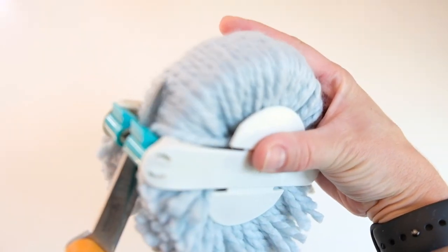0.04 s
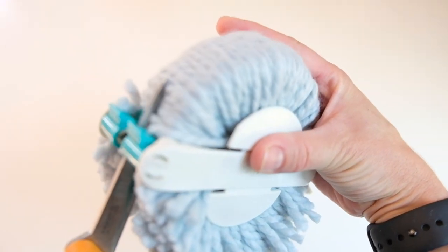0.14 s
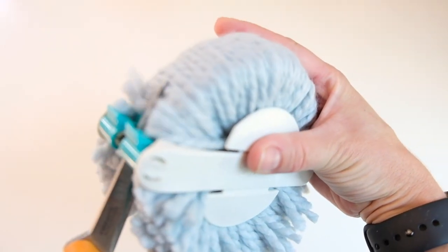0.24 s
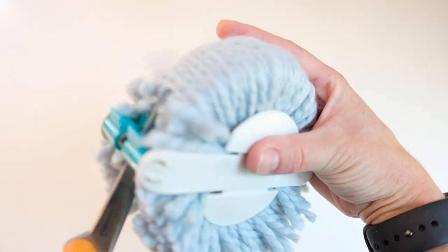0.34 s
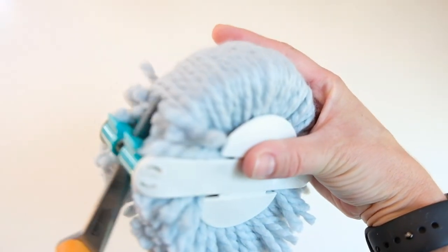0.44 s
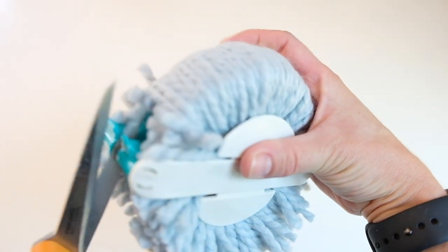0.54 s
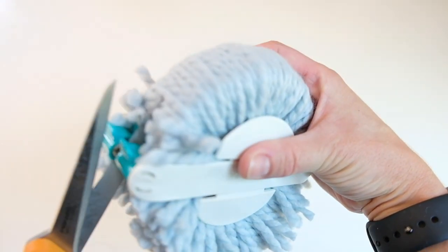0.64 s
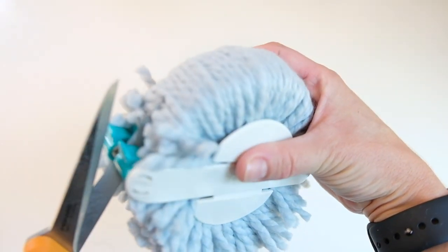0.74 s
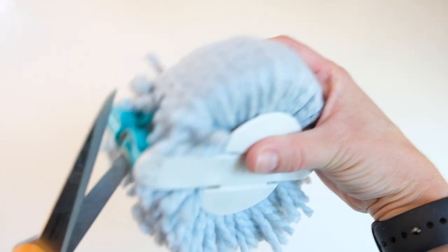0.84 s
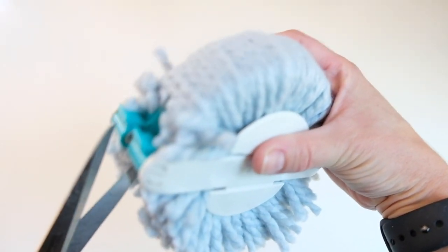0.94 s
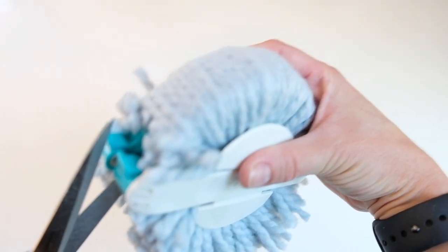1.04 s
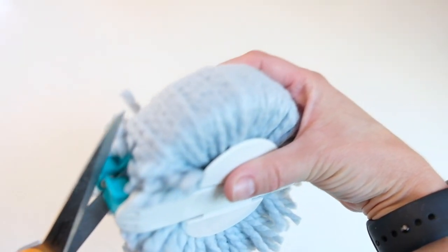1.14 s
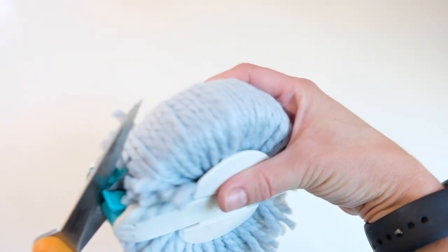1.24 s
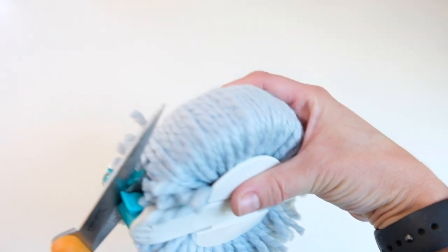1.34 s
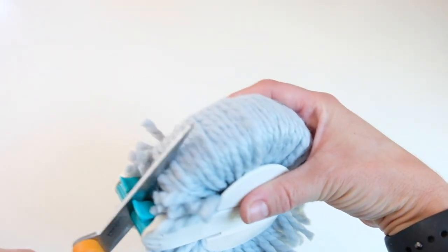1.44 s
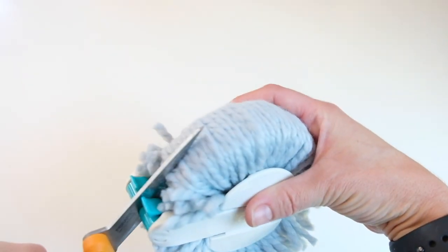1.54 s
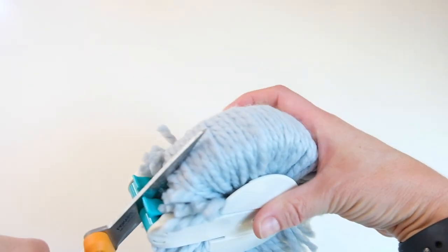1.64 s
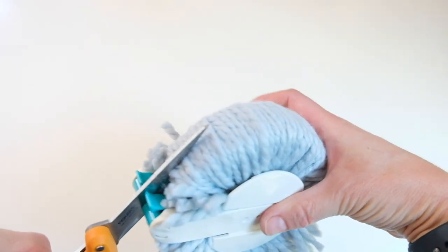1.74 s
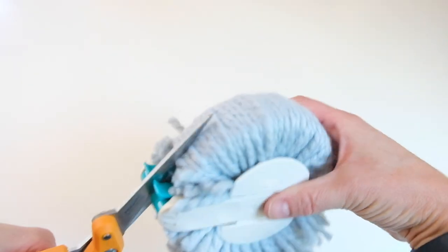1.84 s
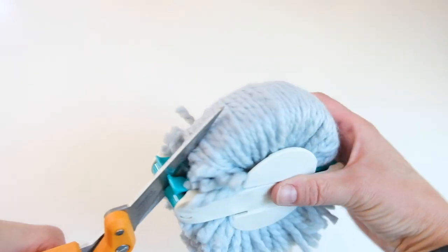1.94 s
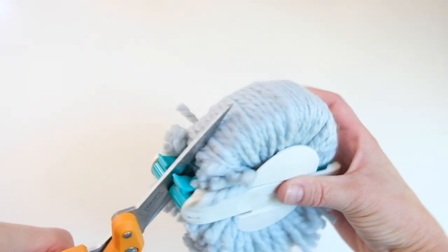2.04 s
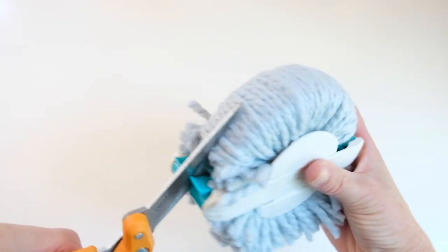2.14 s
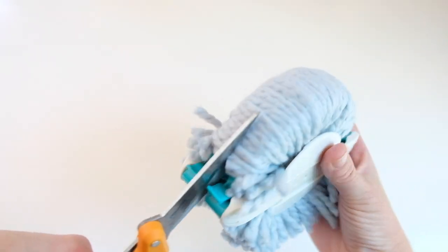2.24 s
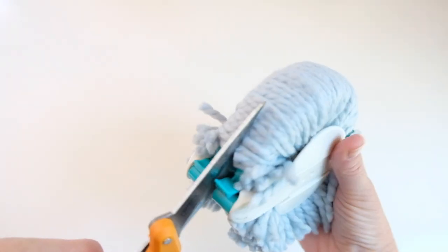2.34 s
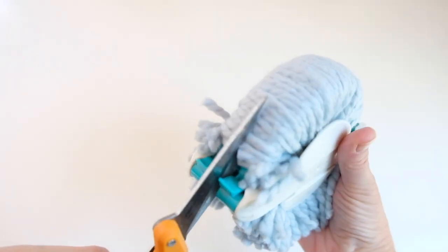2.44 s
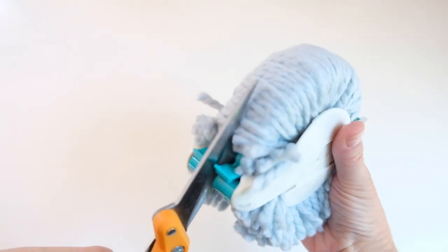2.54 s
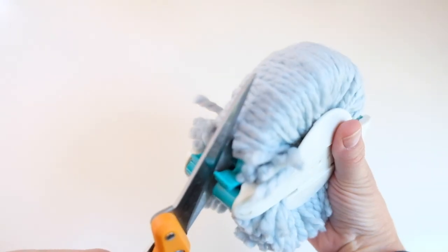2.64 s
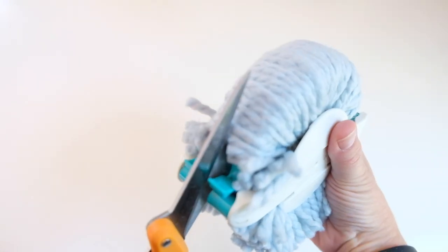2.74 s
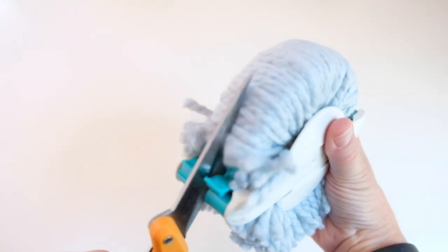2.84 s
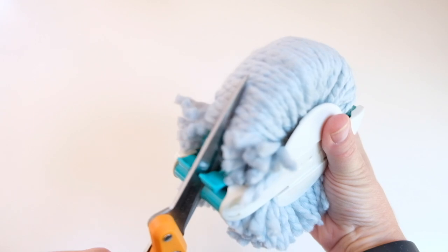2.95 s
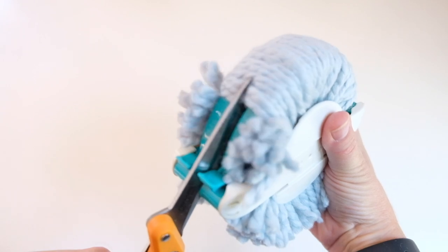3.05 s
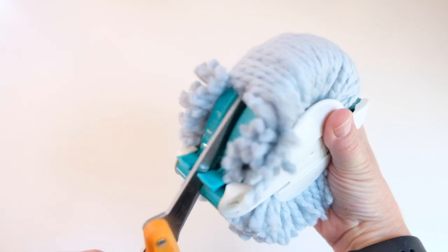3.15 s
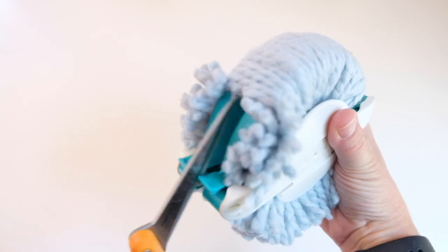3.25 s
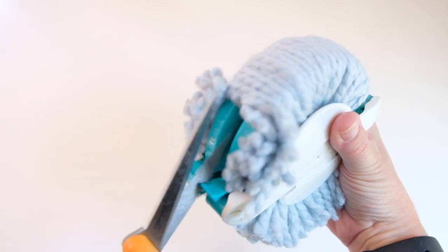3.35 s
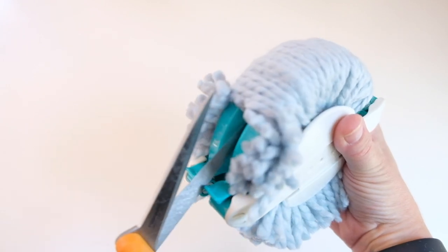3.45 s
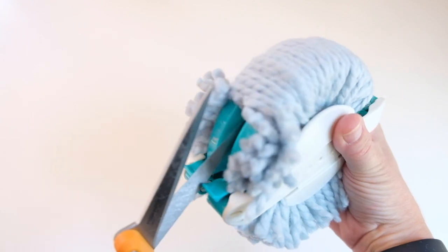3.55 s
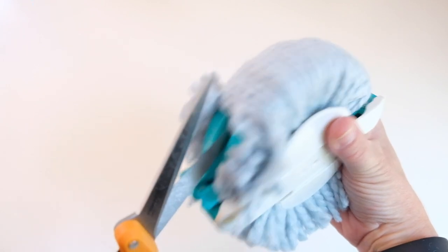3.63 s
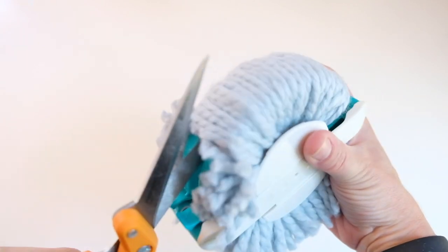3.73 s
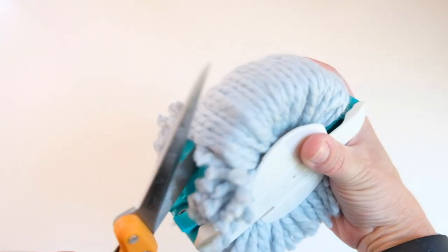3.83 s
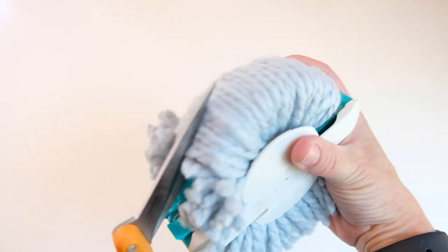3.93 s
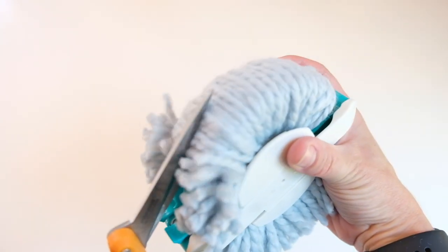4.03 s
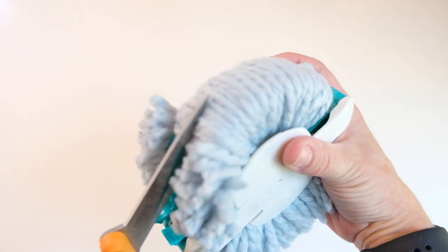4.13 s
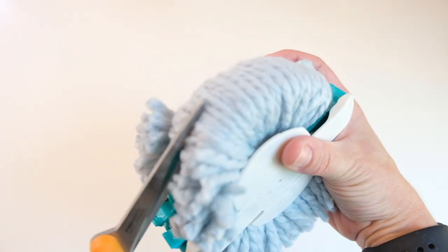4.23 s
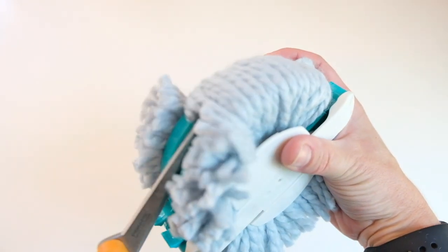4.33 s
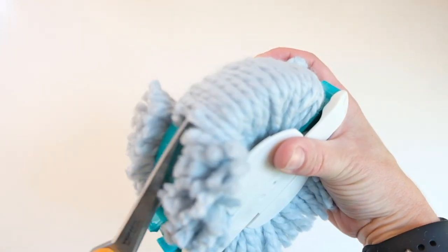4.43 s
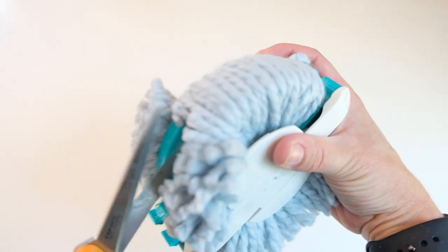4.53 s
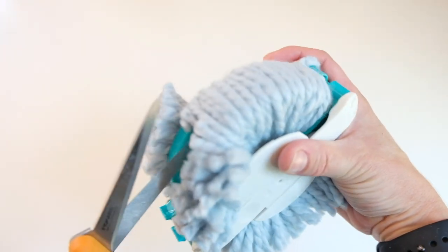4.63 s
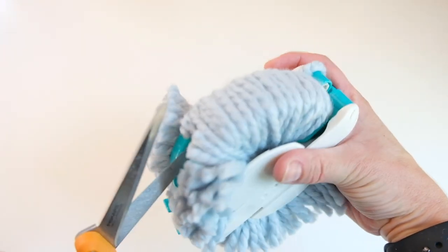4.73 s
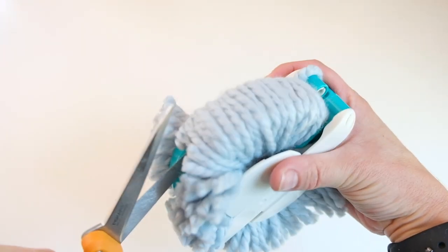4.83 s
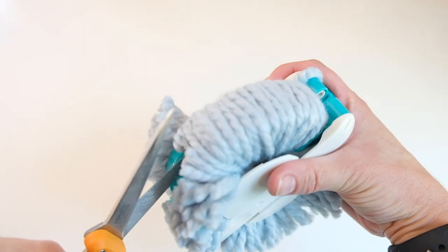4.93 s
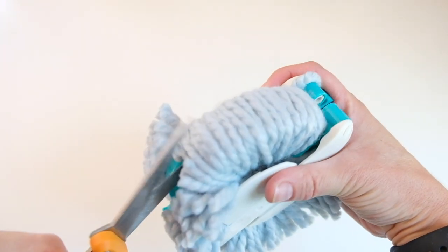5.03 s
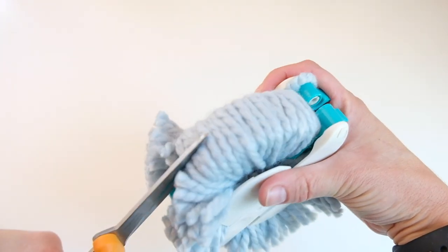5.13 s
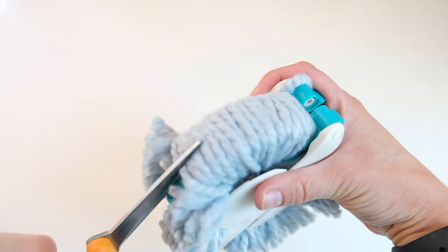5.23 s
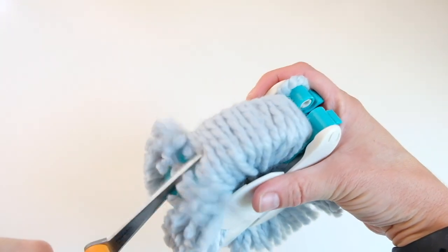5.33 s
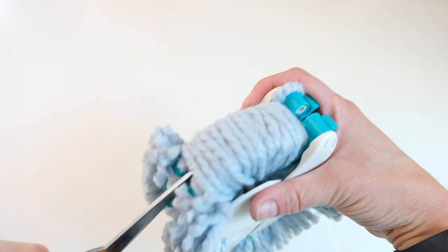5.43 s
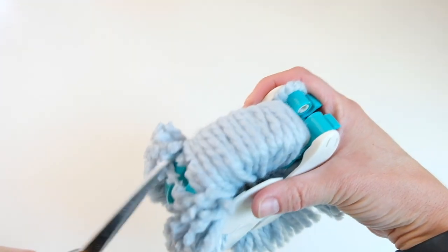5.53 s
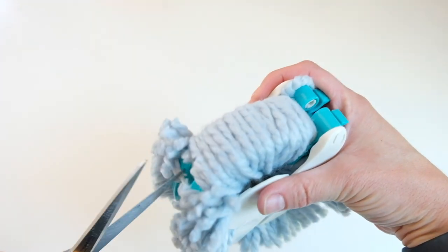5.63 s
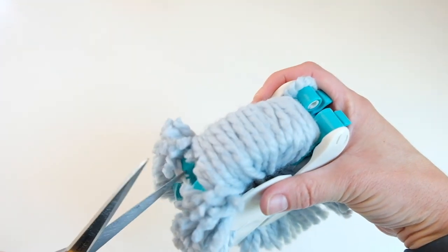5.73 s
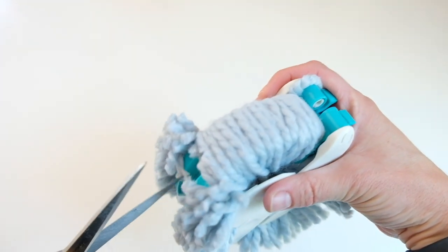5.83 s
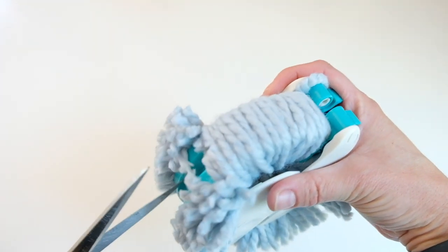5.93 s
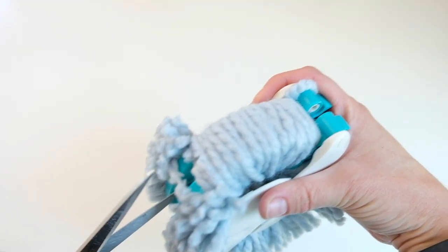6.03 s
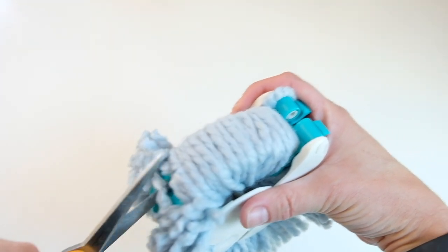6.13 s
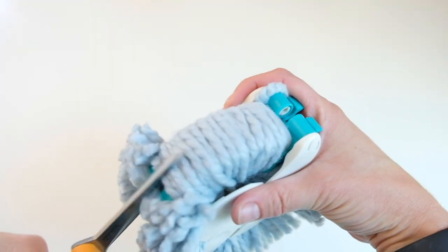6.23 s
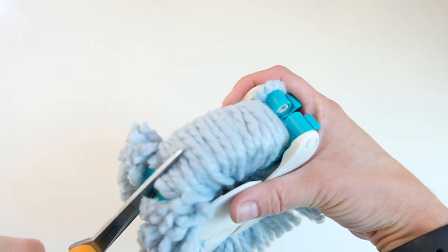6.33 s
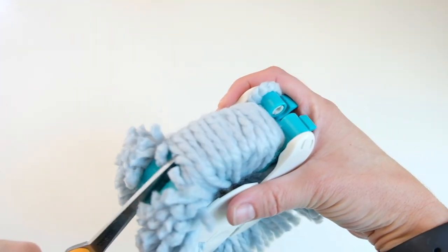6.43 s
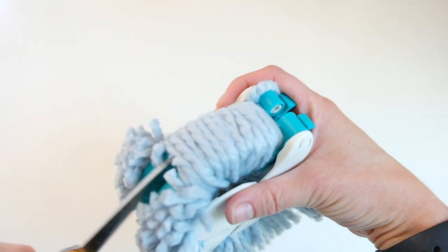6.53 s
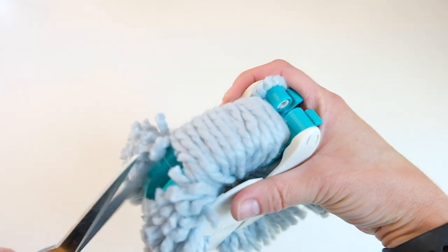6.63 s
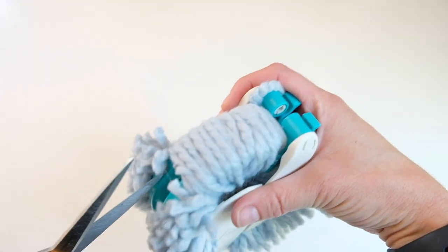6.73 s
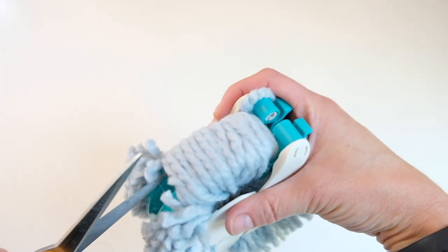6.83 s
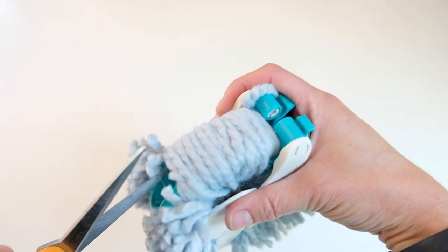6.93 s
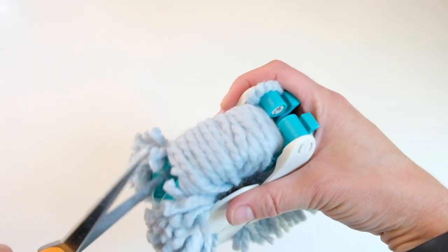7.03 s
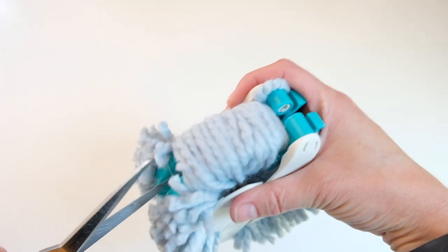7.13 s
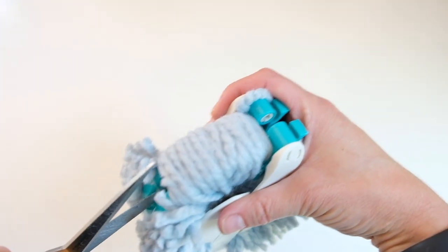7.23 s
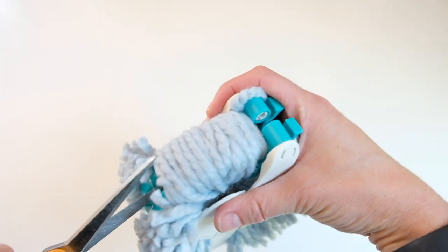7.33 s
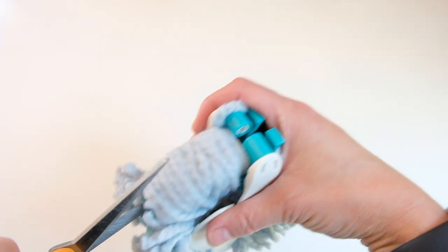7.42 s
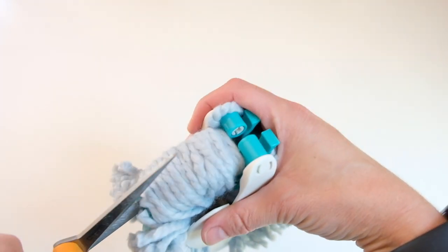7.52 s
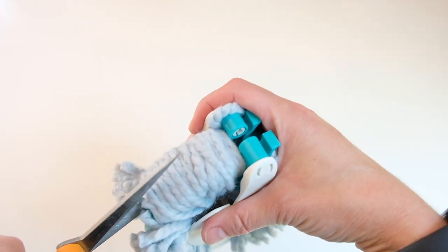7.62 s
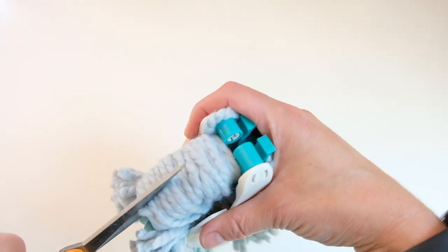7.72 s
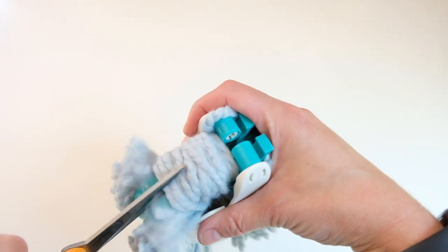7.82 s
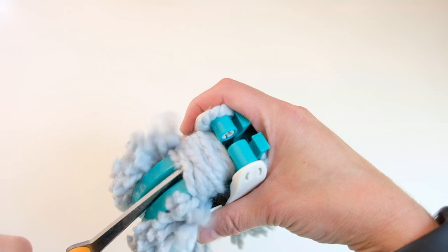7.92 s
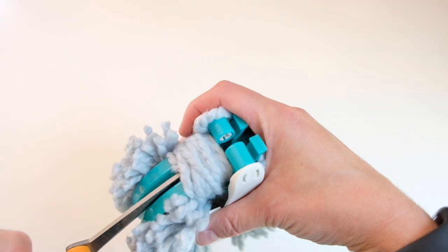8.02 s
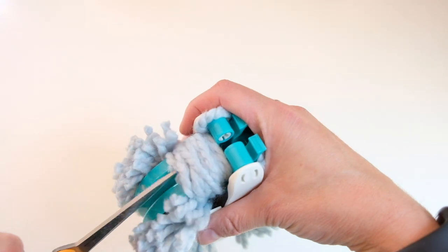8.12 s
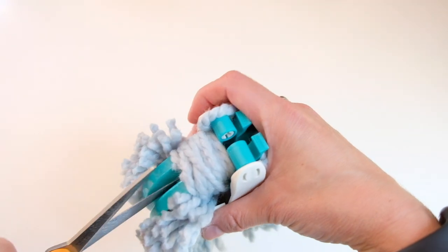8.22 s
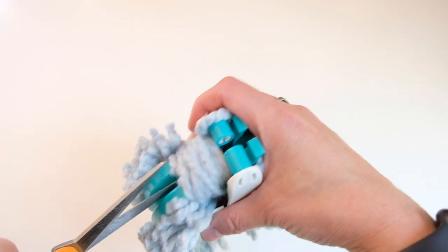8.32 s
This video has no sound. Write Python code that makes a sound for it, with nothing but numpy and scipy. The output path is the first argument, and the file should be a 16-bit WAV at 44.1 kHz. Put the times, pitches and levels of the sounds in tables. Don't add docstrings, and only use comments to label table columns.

```python
import sys
import numpy as np
from scipy import signal
from scipy.fft import rfft, irfft
from scipy.io import wavfile

SR = 44100
rng = np.random.default_rng(int(sys.argv[2]) if len(sys.argv) > 2 else 0)


def pcm_store(signal):
    levels = np.round(np.clip(np.atleast_2d(signal), -1, 1) * 32767)
    wavfile.write(sys.argv[1], SR, levels.astype(np.int16).T)


def ratio(d):
    e = np.asarray(d, float) / 20
    return 10 ** e


N = 369161

# time in seconds, peak in dB, pivot in dB,
# edge in dB, length in ms.
SNAPS = [
    (0.3185, -13, -8.5, -12.5, 1.18),
    (3.1162, -16, -9.5, -7, 1.2),
    (4.294, -12, -10.5, -13, 0.825),
    (5.3605, -14.5, -8.5, -11, 0.617),
    (6.4362, -15, -15, -23, 0.771),
    (7.9143, -16, -5, -11, 1.223),
]
# pitch in Hz, width in Hz, level in dB.
TOOL_MODES = [(740, 490, 5), (1255, 89, -7), (2220, 300, -20.5), (2862, 820, -0.5), (5922, 650, -1.5),
              (8140, 1400, .5), (10460, 1100, -2.5), (13260, 2000, -.5)]


def rms_one(x):
    return x / np.sqrt(np.mean(x ** 2) + 1e-20)


def unit_energy(x):
    return x / np.sqrt(np.sum(x ** 2))


def at_hz(points, hz):
    table_hz, value = np.transpose(points)
    return np.interp(np.log(hz), np.log(table_hz), value)


def band(x, low_hz, high_hz):
    return signal.sosfilt(signal.butter(2, [low_hz, high_hz], "band", fs=SR, output="sos"), x + 1e-18)


def resonance(x, hz, width_hz):
    r = np.exp(-np.pi * width_hz / SR)
    feedback = [1, -2 * r * np.cos(2 * np.pi * hz / SR), r * r]
    return signal.lfilter((1 - r * r) / 2 * np.array([1, 0, -1]), feedback, x)


def resonate(x, modes, direct_db):
    out = ratio(direct_db) * x
    for hz, width_hz, level_db in modes:
        out = out + ratio(level_db) * resonance(x, hz, width_hz)
    return out


def grains(per_s, spread_db):
    sizes = ratio(spread_db * np.minimum(rng.exponential(1, N), 4)) * rng.choice([-1, 1], N)
    return rms_one(sizes * (rng.random(N) < per_s / SR))


def swells(rows, source, width_share, width_hz):
    out = np.zeros(N)
    for s, half_s, db, hz in rows:
        at = np.arange(max(0, int((s - 2 * half_s) * SR)), min(N, int((s + 2 * half_s) * SR)))
        width = width_share * hz + width_hz
        sung = resonance(resonance(source[at], hz, width), hz, width)
        out[at] += ratio(db) * np.exp(-((at / SR - s) / half_s) ** 4) * rms_one(sung)
    return out


def air():
    # pitch in Hz, level in dB per Hz.
    colour = [(12, -32), (30, -15), (65, -9), (193, -18.5), (228, -13), (310, -14.5), (357, -12.5),
              (422, -17), (459, -17), (949, -22), (1090, -25), (2020, -25), (2670, -29.5), (4420, -33),
              (16000, -35)]
    hz = np.maximum(np.arange(N // 2 + 1) * SR / N, 1)
    spectrum = rfft(rng.standard_normal(N)) * ratio(at_hz(colour, hz))
    return ratio(-64.5) * rms_one(irfft(spectrum, N))


def rumble():
    settled_db, first_db, fade_s = -70, 9.5, 1.2
    lumps = ratio(3.0 * rms_one(band(rng.standard_normal(N), 3, 16)))
    level = ratio(settled_db + first_db * np.exp(-np.arange(N) / SR / fade_s) - 3.5)
    return level * lumps * rms_one(band(rng.standard_normal(N), 35, 180))


def hum():
    # time in seconds, level in dB.
    loudness = [(0, -69.5), (.25, -74), (.55, -67), (1.15, -72), (1.85, -70.5), (2.0, -81), (2.3, -69),
                (2.7, -86), (3.25, -71), (4.25, -69), (4.85, -74), (5.5, -62), (6.0, -67), (6.5, -64.5),
                (6.8, -70.5), (8.37, -64)]
    motor_hz = 226.7
    t = np.arange(N) / SR
    wander = .5 * rms_one(np.cumsum(band(rng.standard_normal(N), 10, 11)))
    level = np.sqrt(2) * ratio(np.interp(t, *np.transpose(loudness)))
    return level * np.sin(2 * np.pi * motor_hz * t + .3 * wander)


def crunches():
    # time in seconds, energy in dB,
    # blade pitch in Hz, edge in dB, edge pitch in Hz.
    pushes = [(0.018, -22.5, 4690, -9.0, 9100), (0.028, -21.0, 4970, -8.0, 9070),
              (0.039, -23.5, 4960, -0.5, 9000), (0.066, -30.0, 3570, -13.0, 6070),
              (0.08, -20.5, 1710, -8.5, 6820), (0.092, -23.5, 1590, -7.0, 6700),
              (0.149, -18.5, 4470, 2.5, 9290), (0.16, -30.5, 4160, -1.0, 6430),
              (0.182, -35.0, 1000, 1.5, 7570), (0.552, -23.5, 1170, -1.5, 8440),
              (0.85, -43.5, 3520, 5.5, 7960), (1.46, -34.5, 1170, -14.0, 7730),
              (1.485, -26.5, 1280, -14.0, 9320), (1.51, -26.0, 1280, -15.0, 9190),
              (1.53, -39.0, 1230, -9.0, 10130), (2.826, -35.5, 3560, -2.0, 10130),
              (2.845, -30.0, 2400, -12.0, 7800), (2.858, -21.0, 1230, -12.0, 6630),
              (2.868, -16.5, 3950, -1.0, 9800), (2.88, -17.5, 3150, -7.5, 9790),
              (3.905, -27.0, 2350, -12.5, 9970), (3.916, -18.5, 1450, -15.0, 10510),
              (3.95, -31.0, 1240, -16.0, 9630), (3.972, -26.5, 1380, -8.0, 9730),
              (3.986, -18.5, 3040, -3.5, 10120), (3.996, -22.5, 4500, 7.5, 10210),
              (6.244, -33.5, 1910, -7.0, 6580), (6.258, -33.0, 4740, -3.0, 10360),
              (7.07, -40.0, 2030, 1.0, 8190), (7.73, -26.5, 1160, -11.0, 8830),
              (7.745, -29.5, 1140, -6.0, 9430), (7.76, -28.0, 1180, -12.5, 9440),
              (7.775, -29.5, 2340, -5.0, 9980)]
    # time in seconds, energy in dB,
    # blade pitch in Hz, edge in dB, edge pitch in Hz.
    sheared = [(0.106, -15.0, 4500, -2.0, 8850), (0.227, -17.0, 4540, 7.5, 6320),
               (0.245, -34.0, 4250, 5.5, 8650), (2.893, -21.0, 4840, 4.5, 9890),
               (2.972, -35.0, 3010, 5.0, 6700), (2.984, -14.5, 5000, 3.5, 7480),
               (2.991, -24.5, 5490, 6.0, 7660), (3.332, -24.0, 5600, 2.0, 8290),
               (3.338, -27.5, 5400, -5.0, 6350), (3.689, -29.5, 2280, -7.0, 6560),
               (3.723, -34.0, 4960, -6.5, 6060), (4.04, -25.0, 4050, 3.0, 9680),
               (4.083, -19.0, 2620, -3.0, 8300), (4.1, -25.5, 2500, 0.0, 7770),
               (4.113, -17.0, 3090, -6.0, 7270), (4.13, -33.0, 2570, 0.5, 7300),
               (4.256, -36.0, 3220, 3.5, 6630), (4.274, -21.5, 2980, 5.0, 7550),
               (4.279, -23.0, 3090, 13.0, 6500), (4.768, -38.0, 5380, -2.5, 7350),
               (4.785, -32.0, 4080, -4.0, 8800), (5.213, -21.5, 2680, -12.0, 6290),
               (5.221, -25.5, 5030, -11.0, 6010), (5.244, -30.5, 2940, 0.0, 7990),
               (5.259, -15.0, 4320, -5.0, 8410), (5.288, -17.0, 4620, 3.5, 9790),
               (5.317, -19.5, 4430, 9.0, 9380), (5.596, -31.5, 5220, 7.5, 7810),
               (6.37, -43.0, 2790, 6.5, 8970), (6.383, -26.0, 2670, -1.0, 8700),
               (6.397, -30.5, 2700, 3.5, 8560), (6.419, -17.0, 4500, 3.0, 8810),
               (6.426, -17, 4550, 5.0, 8860), (6.66, -37.5, 5600, 13.0, 7780),
               (7.807, -23.5, 4430, 3.0, 9880), (7.845, -14.0, 4530, -3.5, 9930),
               (7.853, -22.5, 4830, -5.0, 8840), (7.87, -37.5, 3970, -0.5, 9610)]
    # pitch in Hz, width in Hz, level in dB.
    blade_modes = [(2580, 120, -12.5), (3130, 110, 5.5), (4500, 290, -6.5), (6070, 120, -24),
                   (7374, 160, -1.5), (8670, 130, 0), (9100, 80, -42.5), (10400, 110, -22),
                   (12900, 230, -40.5), (14060, 240, -15)]

    bundles = [(*row, -9, 3.6) for row in pushes] + [(*row, -19, 2.6) for row in sheared]
    out, fibres = np.zeros(N + SR), grains(14000, 2.6)
    for s, energy_db, hz, edge_db, edge_hz, tool_db, ms in bundles:
        start = max(0, int((s - .025) * SR))
        t = ((start + np.arange(SR // 12)) / SR - s) * 1000 / ms
        torn = fibres[start:start + len(t)] * np.exp(-np.abs(t / 1.4) ** 1.5)

        modes = np.array(blade_modes) * [edge_hz / blade_modes[5][0], 3.0, 1]
        modes[:, 2] += 3.0 * rng.standard_normal(len(modes))
        modes = modes[modes[:, 0] < 18000]

        blade = unit_energy(resonance(torn, hz, 0.16 * hz) + ratio(-12) * band(torn, 1700, 5400))
        edge = unit_energy(resonate(band(torn, 5400, 12800), modes, direct_db=-10.5))
        tool = unit_energy(resonance(band(torn, 800, 1300), 1250, 500))
        crunch = blade + ratio(edge_db) * edge + ratio(tool_db - 3.5) * tool
        out[start:start + len(t)] += ratio(energy_db - 2.5) * crunch
    return out[:N]


def rasp(low_hz, count, tilt_db):
    out, rub = 0, [grains(9000, 3.0), grains(9000, 2.7)]
    points = N // 40 + 1
    together = rms_one(band(rng.standard_normal(points), 200, 1600))
    for k in range(count):
        own = rms_one(band(rng.standard_normal(points), 100, 1000))
        patch_db = np.interp(np.arange(N) / 40, np.arange(points), 2.0 * together + 3.5 * own)
        hz = low_hz * 2 ** (k / 3)
        out = out + ratio(patch_db + tilt_db * k) * resonance(rub[k % 2], hz, hz / 4)
    return rms_one(out)


def slides():
    # time of most pressure in seconds, groove in dB, wool in dB, seconds to fade by 10 dB.
    strokes = [(0.02, -50.5, -62, 0.2075), (0.16, -60, -58.5, 0.0164), (0.52, -51, -74, .13),
               (.75, -66, -76, .2), (.85, -75, -66, .03), (1.1, -64, -68, .08), (0.92, -64, -67, 0.09),
               (1.2, -79.5, -66, 0.0561), (1.5, -57, -74, .1), (1.7, -72, -70, .08),
               (2.884, -52.5, -66, 0.1633), (3.02, -62, -56.5, 0.1047), (3.32, -56, -59, 0.08),
               (3.68, -60, -67, .05), (3.962, -55, -62, 0.094), (4.11, -62, -55, 0.0815),
               (4.52, -55.5, -65.5, 0.0372), (4.8, -66, -66.5, 0.04), (5.12, -72, -69, .05),
               (5.26, -68.5, -58, 0.1725), (5.67, -63.5, -69.5, 0.0059), (6.4, -76, -55.5, 0.11),
               (6.74, -62, -70, 0.12), (7.25, -71.5, -74.5, 0.13), (7.45, -63.5, -62, 0.03),
               (7.79, -57.5, -59.5, 0.1732), (8.3, -63, -74, 0.28)]
    rise_share = 0.48
    t, levels = np.arange(0, N, 40) / SR, 0
    for s, groove_db, wool_db, fade_s in strokes:
        away = np.where(t < s, (s - t) / rise_share, t - s) / fade_s
        levels = levels + ratio([[groove_db], [wool_db]]) * ratio(-10 * away)
    groove, wool = [np.interp(np.arange(N) / SR, t, level) for level in levels]
    groove_rub = groove * rasp(1050, count=7, tilt_db=-1.6)
    wool_rub = wool * rasp(3980, count=6, tilt_db=-1.0)
    return ratio(-5.0) * (groove_rub + wool_rub)


def catches():
    # time in seconds, half length in seconds, level in dB, pitch in Hz.
    caught = [(.03, .018, -56, 1570), (.03, .015, -58, 9200), (.076, .008, -56, 1100),
              (.086, .016, -54, 1600), (.145, .005, -54, 1000), (.228, .008, -56, 1500),
              (.55, .05, -62, 1800), (1.385, .006, -56, 2900), (1.4, .012, -66, 4600),
              (1.48, .03, -66, 2200), (1.49, .05, -62, 1140), (1.5, .04, -68, 4530), (1.51, .05, -67, 1620),
              (2.87, .025, -52, 2800), (2.985, .008, -50, 2900), (3.69, .03, -65, 2200),
              (3.96, .03, -65, 1300), (3.99, .012, -56, 4500), (4.11, .03, -58, 7800),
              (4.575, .025, -62, 1900), (4.62, .05, -71, 2100), (5.127, .008, -60, 4600),
              (5.127, .008, -64, 3000), (5.215, .01, -56, 2700), (5.215, .01, -56, 4800),
              (6.265, .02, -62, 4700), (6.39, .02, -63, 4700), (6.422, .008, -44, 4600),
              (6.76, .04, -62, 1590), (6.85, .15, -73, 1980), (7.105, .008, -54, 2270),
              (7.17, .04, -71, 2270), (7.74, .015, -58, 2350), (7.75, .03, -58, 3500),
              (7.78, .01, -56, 2300), (7.807, .008, -52, 4600), (7.85, .012, -50, 4700),
              (7.85, .012, -52, 2700)]
    return swells(caught, grains(6000, 2.5), width_share=.15, width_hz=0)


def drones():
    # time in seconds, half length in seconds, level in dB, pitch in Hz.
    far_noises = [
        (.7, .25, -69, 350),
        (.7, .25, -75, 900),
        (2.3, .3, -68, 350),
        (2.3, .3, -75, 900),
        (3.46, .04, -63, 570),
        (8.2, .2, -68, 330),
    ]
    return swells(far_noises, rng.standard_normal(N), width_share=0, width_hz=110)


def part_levels(row):
    s, peak_db, pivot_db, edge_db, length_ms = row
    return peak_db - 1.0 + np.array([-15.5, pivot_db, 0, edge_db])


def through_parts(drive):
    # lowest pitch in Hz, highest pitch in Hz.
    ranges = [(400, 1500), (1500, 3800), (3800, 7500), (7500, 15500)]
    return sum((-1) ** k * band(drive[k], *edges) for k, edges in enumerate(ranges))


def bursts(source, rise, lead, gain_db):
    drive = np.zeros((4, N))
    for row in SNAPS:
        s, length_s = row[0], row[4] / 1000
        at = np.arange(int((s - .03) * SR), int((s + .06) * SR))
        t = (at / SR - s) / length_s - lead
        shape = np.where(t < 0, np.exp(-np.abs(t / rise)), np.exp(-np.abs(t)))
        drive[:, at] += ratio(part_levels(row) + gain_db)[:, None] * shape
    return through_parts(drive * source)


def contacts():
    push_db = np.array([29.43, 18.46, 17.54, 14.5])
    drive = np.zeros((4, N))
    for row in SNAPS:
        drive[:, int(row[0] * SR)] += ratio(part_levels(row) + push_db)
    return resonate(through_parts(drive), TOOL_MODES, direct_db=-3)


def snaps():
    spray = bursts(grains(16000, 2.0), rise=.35, lead=.7, gain_db=2.5)
    tear = bursts(grains(20000, 2.5), rise=2.6, lead=0, gain_db=-8)
    contact = contacts()
    fibres = resonate(spray, TOOL_MODES, direct_db=-1) + resonate(tear, TOOL_MODES, direct_db=-6)
    return ratio(-21) * contact + fibres, contact


def jolts():
    # time in seconds, peak in dB, pitch in Hz.
    jerks = [(0.319, -52, 51.1), (0.919, -52, 88.8), (1.003, -42.5, 296), (1.51, -56.5, 64.6),
             (2.983, -45.5, 100), (3.115, -43, 241), (3.384, -45, 113), (4.291, -43.5, 77.9),
             (4.517, -43, 338.8), (5.359, -40, 270), (5.636, -35.5, 399.7), (6.27, -52.5, 69.86),
             (6.435, -52, 215), (6.686, -39.5, 399.3), (7.272, -56.5, 50.7), (7.471, -47, 211.1),
             (7.915, -41, 231), (8.231, -54, 59.2)]
    out, t = np.zeros(N + SR), np.arange(SR // 10) / SR
    for s, peak_db, hz in jerks:
        push = np.sin(2 * np.pi * hz * t) * np.exp(-1.6 * hz * t)
        out[int(s * SR):int(s * SR) + len(t)] += ratio(peak_db + 3) * push
    return out[:N]


def touches():
    # time in seconds, energy in dB,
    # ring pitch in Hz, crack in dB, tool in dB.
    knocks = [(0.4846, -18, 2000, -17, -10.5), (1.0478, -28, 2976, 0.5, -9),
              (1.1336, -29.5, 3560, -14.5, -14), (3.016, -28, 3130, 5, -15),
              (3.2626, -30.5, 2730, -12.5, -21), (3.356, -22, 3314, -13, -8.5),
              (3.3862, -14.5, 3270, -7.5, -6), (4.3112, -6, 1962, -6, -23),
              (4.5175, -19, 2009, -10.5, -10.5), (5.6376, -17.5, 2688, -6, -1),
              (6.2707, -28, 4570, -6.5, -12.5), (6.686, -16, 1897, -8.5, -6), (7.0986, -20, 2304, 1.5, -15),
              (7.2464, -27.5, 2270, -0.5, -19), (7.2723, -26.5, 3270, -8, -7.5),
              (7.4347, -30, 2342, -10.5, -14.5), (8.1817, -8.5, 2520, -2, -24),
              (8.2327, -20, 3070, -2, -7.5)]
    # time in seconds, energy in dB, ring pitch in Hz, crack in dB, tool in dB.
    stragglers = [(.3222, -9, 6120, -9, -14), (.3277, -11, 3200, -6, -16), (3.1195, -15, 6000, -2, -10),
                  (3.1227, -18, 6000, -9, -14), (3.3846, -20, 2300, -8, -9), (4.2968, -8, 5150, -9, -12),
                  (4.3017, -11, 5990, -12, -16), (5.3677, -16, 3000, -4, -18), (6.4393, -11, 4700, -9, -22),
                  (6.4457, -19, 5000, -3, -17), (7.9125, -12, 2200, -14, -18), (7.9165, -10, 3000, -7, -12),
                  (7.9255, -16, 2200, -8, -8), (7.932, -21, 3000, -16, -14)]
    # time in seconds, energy in dB,
    # ring pitch in Hz, crack in dB, crack pitch in Hz.
    pings = [(.8997, -44, 4500, 4, 8300), (1.3825, -35, 4300, -20, 8000), (1.388, -33, 2900, -4, 4500),
             (1.144, -38, 2000, -20, 8000), (2.0463, -46, 3000, 4, 8560), (3.2734, -22, 2960, -3, 8000),
             (3.282, -32, 2400, -20, 8000), (3.6728, -32, 3900, 3, 7300), (3.7019, -22, 6010, -2, 13500),
             (3.8345, -46, 4000, -2, 9000), (4.7825, -38, 3000, -3, 9000), (4.801, -40, 3000, 0, 9000),
             (4.812, -43, 4000, 0, 8000), (5.0599, -50, 5000, 6, 11000), (7.5376, -41, 4040, 6, 14500)]
    # time in seconds, energy in dB,
    # ring pitch in Hz, crack in dB.
    light = [(0.4906, -27, 1750, -16), (0.5005, -29.5, 1534, -11.5), (0.9096, -33.5, 3070, 0.5),
             (0.9252, -34.5, 4720, -8.5), (1.004, -33, 1615, -14), (1.075, -40.5, 1610, -3),
             (1.093, -40, 3560, -3), (1.1657, -36.5, 2930, -7), (1.4357, -43, 4470, -17),
             (1.5782, -44, 2110, 1.5), (1.624, -40, 2400, -9), (1.9536, -41.5, 1490, -13),
             (2.0584, -37, 3850, -6.5), (2.2139, -35.5, 3680, -17.5), (2.403, -43.5, 2540, -1.5),
             (2.5321, -43, 1310, -12.5), (2.8092, -47.5, 3095, -4.5), (2.9489, -47, 1797, 9),
             (3.644, -44, 3140, -10), (5.1263, -40, 4580, -15), (6.0909, -48.5, 5050, 4.5),
             (6.865, -35, 1100, -20), (7.3884, -44, 2280, -12), (7.4725, -42, 1304, -9.5)]
    crack_hz = 7990
    rows = [(*row, crack_hz, -4.5) for row in knocks]
    rows += [(*row, crack_hz, -8) for row in stragglers]
    rows += [(*row[:4], -24, row[4], -12) for row in pings]
    for row in light:
        tool_db = -3.5 - 4.5 * np.log2(row[2] / 2000)
        rows.append((*row, tool_db, crack_hz, -3.5))
    return rows


def ticks():
    chatter_ms, table_echo_s, table_echo_db = .5, .009, -12
    out, click = np.zeros((2, N + SR)), np.zeros(SR // 20)
    click[0] = 1
    knock = unit_energy(resonate(band(click, 370, 1600), TOOL_MODES[:2], direct_db=-1.5))
    fading = np.exp(-np.arange(SR // 200) * 1000 / SR / chatter_ms)
    for s, energy_db, hz, edge_db, tool_db, crack_hz, rattle_db in touches():
        contact = click.copy()
        contact[:len(fading)] += ratio(-9) * rng.standard_normal(len(fading)) * fading

        crack = resonance(band(contact, .75 * crack_hz, min(1.3 * crack_hz, 18000)), crack_hz, 1800)
        crack = crack + ratio(rattle_db * 1.8 - 5.5) * band(click, 6500, 17500)
        body = unit_energy(band(click, .6 * hz, 1.8 * hz))
        ring = unit_energy(resonance(contact, hz, 0.1 * hz))
        echo = ratio(table_echo_db + rattle_db + 4) * np.roll(ring, int(table_echo_s * SR))
        tick = unit_energy(ring + .4 * body) + echo
        tick = tick - ratio(tool_db) * knock - ratio(edge_db) * unit_energy(crack)

        wide = ratio(edge_db - 2.0) * unit_energy(band(click, .55 * crack_hz, 14000))
        loose = unit_energy(unit_energy(resonance(click, hz, .6 * hz)) + body)
        loose = loose - ratio(tool_db) * knock - wide
        at = slice(int(s * SR), int(s * SR) + len(click))
        out[0, at] += ratio(energy_db - .6) * tick
        out[1, at] += ratio(energy_db + rattle_db + 3.5) * loose
    return out[:, :N]


def squeak():
    middle_s, half_s, top_hz, sag_hz = 2.43, 0.115, 2860, 380
    u = (np.arange(N) / SR - middle_s) / half_s
    hz = top_hz - sag_hz * np.minimum(u ** 2, 2) ** 1.5
    broken = ratio(4.0 * rms_one(band(rng.standard_normal(N), 12, 70)))
    return ratio(-71.5) * broken * np.exp(-u ** 2) * np.sin(2 * np.pi * np.cumsum(hz) / SR)


def near_answer(ms, white):
    # delay in ms, level in dB.
    reflections = [(.4, -26), (3, -24.5), (5, -30.5), (9, -29), (12, -33), (15, -46), (22, -53), (40, -68)]
    dull_hz, dull_db_per_ms = 9000, .3
    top = band(white, dull_hz, 19000)
    dulled = white - top * (1 - ratio(-dull_db_per_ms * ms))
    return dulled * ratio(np.interp(ms, *np.transpose(reflections), right=-120))


def far_answer(t, white):
    # pitch in Hz, seconds to fade by 60 dB.
    fade_times = [(300, 0.43), (1000, 0.35), (2500, 0.37), (6000, 0.31), (12000, 0.27)]
    # pitch in Hz, level in dB.
    wall_levels = [(300, -48), (900, -40.5), (1400, -42), (2500, -37), (4000, -36), (6500, -35.5),
                   (9000, -37.5), (12000, -41)]
    start_s, swell_s, echo_s = 0.02787, .017, 0.056
    since, far = np.maximum(t - start_s, 0), 0
    for k, hz in enumerate(200 * 2 ** np.arange(0, 6.4, .5)):
        dying = ratio(at_hz(wall_levels, hz) - 60 * since / at_hz(fade_times, hz))
        far = far + band(white[k % 2], hz / 1.19, hz * 1.19) * dying
    click = np.zeros(len(t))
    click[int(echo_s * SR)] = 1
    echo = ratio(-14.5) * band(click, 720, 1050)
    return far * (1 - np.exp(-(since / swell_s) ** 2)) + echo


def room(direct, rattling, radiated):
    t = np.arange(SR // 2 + SR // 4) / SR
    ms = t[:SR // 20] * 1000
    pose = (np.arange(N) / SR // .37) % 5
    radiated = radiated - .5 * resonance(radiated, 4850, 1000)
    for place in range(5):
        white = rng.standard_normal((2, len(t)))
        near = near_answer(ms, white[0, -len(ms):])
        far = far_answer(t, white)
        direct = direct + signal.oaconvolve(rattling * (pose == place), near)[:N]
        direct = direct + signal.fftconvolve(radiated * (pose == place), far)[:N]
    return direct


def scene():
    rubbing = crunches() + slides()
    crack, contact = snaps()
    tick, rattle = ticks()
    rattling = crack + rattle + ratio(-4) * rubbing
    radiated = ratio(3.5) * contact + ratio(-2.5) * rattle + ratio(-6.5) * tick + ratio(-2.5) * rubbing
    close = room(crack + tick + rubbing, rattling, radiated)
    mono = close + air() + rumble() + hum() + catches() + drones() + jolts() + squeak()
    return np.array([mono, mono])


def top_cut(x):
    return signal.sosfilt(signal.butter(12, 16990, fs=SR, output="sos"), x)


def record(dry):
    dry = .45 * np.tanh(dry / .45)
    wavering = rms_one(band(rng.standard_normal(N), 22, 300))
    shelf = dry[0] + ratio(2) * band(dry[0], 11000, 17000) + ratio(4.5) * band(dry[0], 20, 500)
    difference = ratio(-31) * wavering * shelf + ratio(-18) * band(air(), 8000, 16000)
    pair = dry + difference * [[1], [-1]]
    pair = signal.sosfilt(signal.cheby2(8, 19, 16000, fs=SR, output="sos"), pair)
    mix = signal.sosfilt(signal.cheby2(10, 50, 17300, fs=SR, output="sos"), pair)
    return top_cut(mix)


dry = scene()
out = record(dry)
pcm_store(out)
```